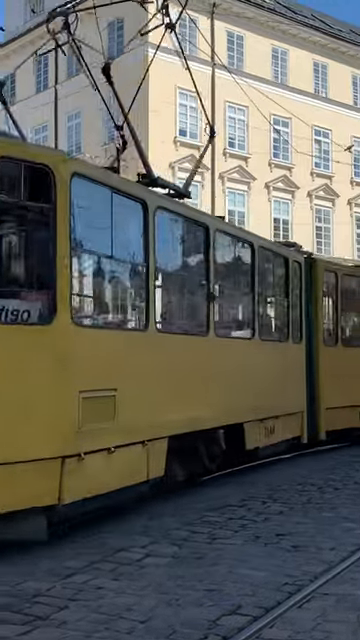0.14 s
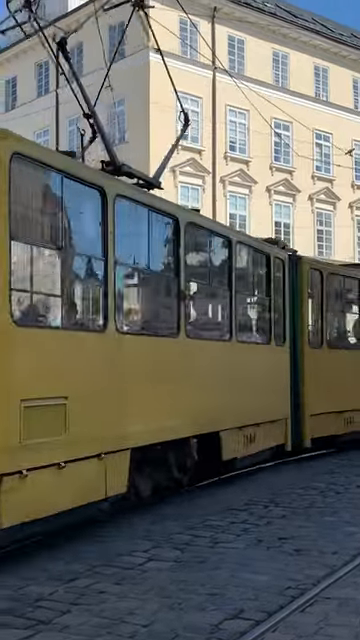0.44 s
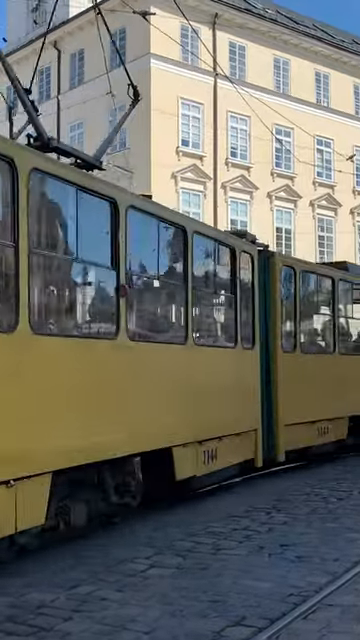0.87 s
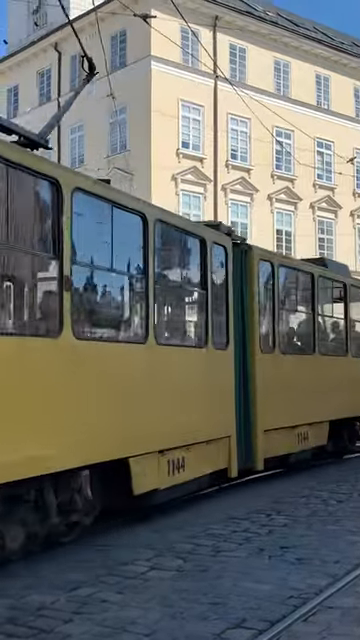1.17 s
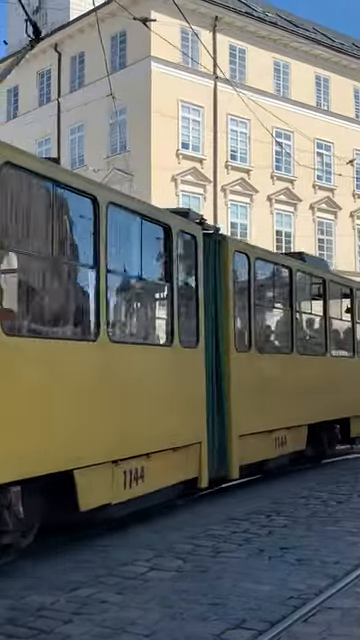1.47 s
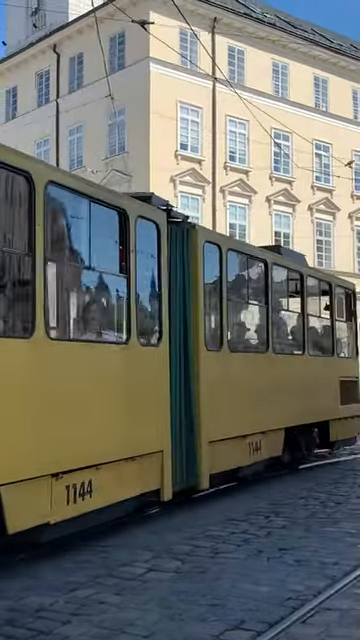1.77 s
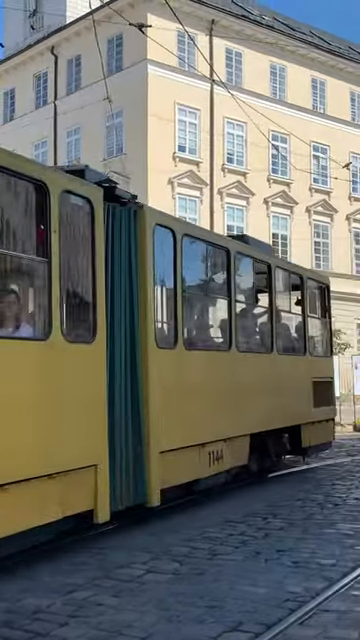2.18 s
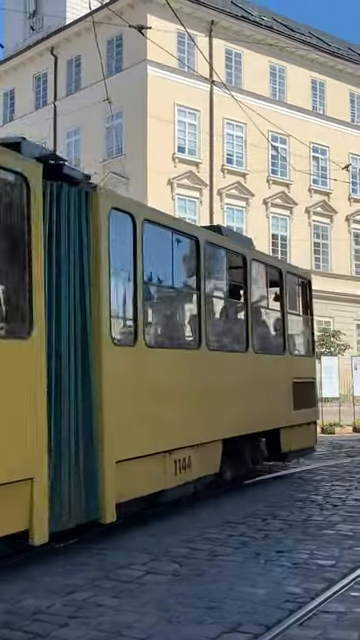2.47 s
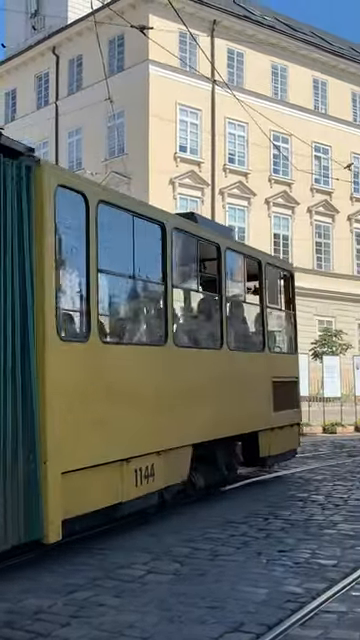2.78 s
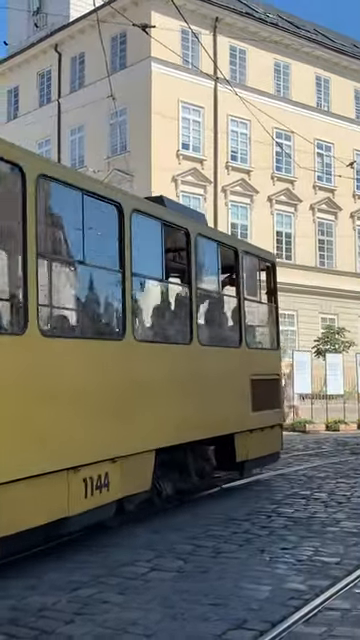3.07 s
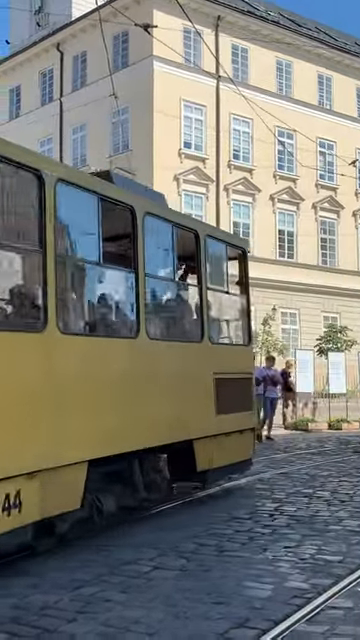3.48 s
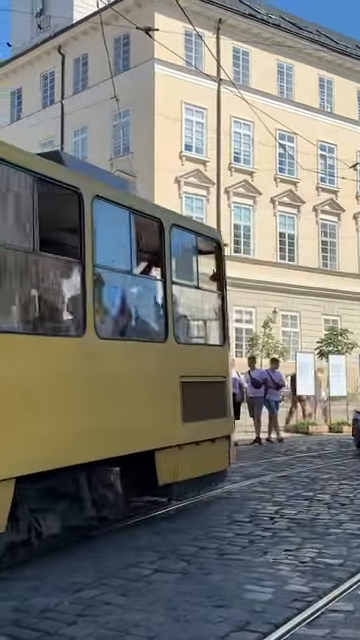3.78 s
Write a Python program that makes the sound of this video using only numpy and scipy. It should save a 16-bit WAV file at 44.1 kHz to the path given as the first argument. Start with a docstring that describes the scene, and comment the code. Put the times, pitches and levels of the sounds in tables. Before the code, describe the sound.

Passing tram with low rumble, grinding wheels and hissing rails, ending in groans and very high squeal

```python
"""A tram creeps round a bend on a cobbled street, a few metres away: shaped noise makes its body rumble and its
wheels roll and grind. The flanges hiss on the rail as noise, which sets the steel ringing in narrow noise bands.
One sharp clack and a dull bump come early, made of fading sine waves. Later a low groan of sine waves swells
three times, loose steel rattles in fading sine waves and scrapes of noise, and a rough, very high squeal wavers
as the rear bogie (wheel frame) draws near."""
import sys
import numpy as np
from scipy import signal
from scipy.fft import rfft, irfft
from scipy.io import wavfile

SR = 44100
rng = np.random.default_rng(int(sys.argv[2]) if len(sys.argv) > 2 else 0)


def materialize(psi):
    """Save the field psi as 16-bit PCM at rate SR to the path in sys.argv[1].

    A 1-D psi becomes a single channel; in a 2-D psi each row is a channel.
    """
    bounded = np.clip(np.atleast_2d(psi).T, -1, 1)
    quanta = np.round(bounded * 32767).astype(np.int16)
    wavfile.write(sys.argv[1], SR, quanta)


N = 173754
T = np.arange(N) / SR  # time of every sample, s
HZ = np.maximum(np.arange(N // 2 + 1) * SR / N, 1)  # frequency of every spectrum bin


def from_db(db):
    """Turn decibels into gain."""
    return 10 ** (np.asarray(db) / 20)


def rms_one(x):
    """Scale to an rms of 1."""
    return x / np.sqrt(np.mean(x ** 2) + 1e-20)


def in_time(rows):
    """Draw straight lines between a table's rows, giving each column at every sample."""
    s, *columns = np.transpose(rows)
    return [np.interp(T, s, column) for column in columns]


def at_hz(points, hz=HZ):
    """Read a table along log frequency, with straight lines between its rows."""
    f, value = np.transpose(points)
    return np.interp(np.log(hz), np.log(f), value)


def drift(rate_hz):
    """Random wandering with an rms of 1; a higher rate wanders faster."""
    spectrum = rfft(rng.standard_normal(N))
    return rms_one(irfft(spectrum / (1 + (HZ / rate_hz) ** 2), N))


def pan(db):
    """Left and right gains that differ by the given decibels; positive is louder on the left."""
    return from_db(np.array([[.5], [-.5]]) * db)


# How alike the two channels are: f/Hz, correlation (1 = the same, 0 = unrelated)
CHANNEL_LIKENESS = [(60,.96),(100,.95),(160,.88),(300,.8),(450,.6),(740,.25),(1100,.45),(2000,.35),(4000,.25),(7000,.5),(10000,.7)]
# How much later the left channel is (negative = earlier): f/Hz, delay/s
LEFT_DELAY = [(400,-.00012),(750,.00002),(1400,.00023),(10000,.0003)]
# How much louder the left channel is than the right: f/Hz, level/dB
LEFT_BALANCE = [(60,2.5),(160,2),(450,4),(1200,6),(2000,1.5),(3300,0.5),(5500,-2),(9000,0)]


def noise(gain):
    """Stereo noise with a gain per frequency; a shared and an opposed part set the width, and its middle has rms 1."""
    mid, side = rfft(rng.standard_normal((2, N)))
    alike = np.clip(at_hz(CHANNEL_LIKENESS), -.99, .99)
    pair = np.sqrt(1 + alike) * mid + np.sqrt(1 - alike) * side * [[1], [-1]]
    pair[0] *= np.exp(-2j * np.pi * HZ * at_hz(LEFT_DELAY))
    x = irfft(pair * gain * pan(at_hz(LEFT_BALANCE)), N)
    return x / x.mean(0).std()


def coloured(spectrum):
    """Noise whose tone colour follows a table; only the table's relative levels matter."""
    return noise(from_db(at_hz(spectrum)))


def resonance(hz, width_hz):
    """Gain of a narrow resonance: half height at width_hz from its centre, scaled to rms 1."""
    return rms_one(1 / (1 + ((HZ - hz) / width_hz) ** 2))


def bursts(rows, rise_s, decay_s):
    """Loudness curve of short events (t/s, level/dB): a straight rise, then an exponential fall."""
    total = 0
    for s, db in rows:
        rise = np.clip((T - s) / rise_s, 0, 1)
        fall = np.exp(-np.maximum(T - s - rise_s, 0) / decay_s)
        total = total + from_db(db) * rise * fall
    return total


def strike(hits, modes, contact_s):
    """Blows (t/s, level/dB) ring fading modes (f/Hz, level/dB, t60/s); longer contact starts more softly."""
    out = np.zeros(N)
    for s, db in hits:
        first = int(s * SR)
        age = T[:min(SR // 2, N - first)]
        ring = 0
        for hz, level, t60 in modes:
            ring = ring + from_db(db + level - 60 * age / t60) * np.sin(2 * np.pi * hz * age)
        out[first:first + len(age)] += ring * (1 - np.exp(-(age / contact_s) ** 2))
    return out


# Levels before trim: t/s, rumble level/dB, drone level/dB
BODY_LEVELS = [(0.0, -37.5, -32), (0.7, -31, -30.5), (0.84, -34, -33), (0.92, -25.5, -29),
               (1.04, -30.5, -31.5), (1.33, -32, -27), (2.37, -36.5, -21.5), (2.53, -38.5, -24),
               (2.98, -28, -21), (3.16, -28, -25.5), (3.57, -29.5, -24.5), (3.94, -27, -23.5)]
# Tone colour of the deep rumble: f/Hz, level/dB
RUMBLE_COLOUR = [(28,-24),(36,-9),(46,-4),(59,4),(72,2),(100,-5),(140,-1.5),(190,-21),(300,-82)]
# Tone colour of the body's drone: f/Hz, level/dB
DRONE_COLOUR = [(100,-6),(150,-8),(195,0),(260,-2),(340,-2),(420,-7.5),(500,-15),(680,-27.5),(1200,-91)]
RUMBLE_TRIM_DB, DRONE_TRIM_DB = -0.5, 1


def rumble_and_drone():
    """The tram's body gives a deep rumble and a higher, unsteady drone, both shaped noise."""
    rumble_db, drone_db = in_time(BODY_LEVELS)
    rumble = from_db(RUMBLE_TRIM_DB + rumble_db) * coloured(RUMBLE_COLOUR)
    unsteady_db = 1.16 * drift(5.4)
    drone = from_db(DRONE_TRIM_DB + drone_db + unsteady_db) * coloured(DRONE_COLOUR)
    return rumble + drone


# Level of the rolling wheels before trim: t/s, level/dB
ROLL_LEVEL = [(0.0, -43), (0.76, -41), (0.92, -38.5), (1.24, -41.5), (1.38, -38), (1.63, -36), (3.94, -35)]
# Tone colour of the rolling wheels: f/Hz, level/dB
ROLL_COLOUR = [(150,-39),(400,0),(520,-3.5),(556,3),(585,-2),(690,-4),(850,0),(1020,1.5),(1200,-8),(1350,-5.5),(1600,-12.5),(2500,-25.5),(5000,-66)]
ROLL_TRIM_DB = 1


def wheel_roll():
    """The wheels roar as they roll: noise of unsteady level."""
    roll_db, = in_time(ROLL_LEVEL)
    return from_db(ROLL_TRIM_DB + roll_db + 1.36 * drift(11.4)) * coloured(ROLL_COLOUR)


# Level of the grit on the rail: t/s, level/dB
GRIT_LEVEL = [(0,-47),(.45,-44),(.6,-46.5),(1.0,-45),(1.5,-44),(1.9,-44.5),(2.2,-39.5),(2.5,-43.5),(3.05,-39),(3.45,-41),(3.62,-38.5),(3.94,-42)]
# Tone colour of the grit: f/Hz, level/dB
GRIT_TONE = [(900,-14.5),(1500,2.5),(2050,4),(2400,-1.5),(3400,-3.5),(4500,-3.5),(5800,-8),(7300,-6.5),(8300,-34),(10500,-9.5),(16000,-34)]


def rail_grit():
    """Grit grinds on the rail: brighter noise that flickers in level."""
    grit_db, = in_time(GRIT_LEVEL)
    return from_db(grit_db + 2.12 * drift(14)) * coloured(GRIT_TONE)


# How strongly the flanges rub the rail, before trims: t/s, level/dB
RUB_LEVEL = [(0,-45.5),(.12,-38.5),(.3,-44.5),(.49,-42),(.55,-55),(.9,-54.5),(1.2,-52.5),(1.56,-54.5),(1.66,-42.5),(1.76,-53),(1.9,-40),(2.3,-42),(2.45,-41),(2.7,-37),(3.0,-41),(3.3,-39.5),(3.48,-51),(3.94,-44.5)]
# Tone colour of the rubbing hiss: f/Hz, level/dB
HISS_COLOUR = [(2000,-17),(4100,-1.5),(5100,-4.5),(7300,-1.5),(8400,-28),(9700,3.5),(11400,0.5),(12600,5.5),(13500,-24),(14500,0),(15700,5)]
# Wheel modes set ringing by the rubbing: f/Hz, width/Hz, front bogie level/dB, later bogies level/dB
WHEEL_MODES = [(2745,55,-18.5,-21),(3275,50,-18,-24),(4120,92,-14.5,-20),(4550,100,-35,-22.5),(6860,49,-9,-20),(9720,120,-12.5,-17),(11335,75,-11,-14),(14600,115,-14.5,-13)]
HISS_TRIM_DB, RING_TRIM_DB, RING_FLUTTER_DB = -1, 5.5, 3
BOGIE_CHANGE_S = 1.2
RING_THRESHOLD_DB, RING_KNEE_DB = -53, 2  # the ringing fades in smoothly around this rubbing level


def flanges():
    """Flanges hiss as they rub the rail; hard enough rubbing keeps the wheel's high modes ringing."""
    rub_db, = in_time(RUB_LEVEL)
    grip = 1 / (1 + np.exp((RING_THRESHOLD_DB - rub_db) / RING_KNEE_DB))
    rings = 0
    for hz, width, front_db, later_db in WHEEL_MODES:
        mode_db = np.where(T < BOGIE_CHANGE_S, front_db, later_db) + RING_FLUTTER_DB * drift(18)
        rings = rings + from_db(mode_db) * noise(resonance(hz, width))
    hiss = from_db(HISS_TRIM_DB) * coloured(HISS_COLOUR)
    ringing = from_db(RING_TRIM_DB) * grip * rings
    return from_db(rub_db + 0.97 * drift(17)) * (hiss + ringing)


# Flange whistles: peak t/s, time from the peak to 1/e of it/s, f/Hz, level/dB
FLANGE_WHISTLES = [(.24,.2,5472,-45),(2.1,.15,5472,-54),(3.1,.1,5942,-49)]
WHISTLE_WIDTH_HZ = 26


def flange_whistles():
    """Now and then a flange whistles: a very narrow band of noise swells and fades."""
    out = 0
    for s, spread, hz, db in FLANGE_WHISTLES:
        swell = np.exp(-((T - s) / spread) ** 2)
        out = out + from_db(db) * swell * noise(resonance(hz, WHISTLE_WIDTH_HZ))
    return out


STREET_DB, STREET_T60_S, STREET_DELAY_S = -7, 0.19, .013  # tram's side and cobbles
SQUARE_DB, SQUARE_T60_S, SQUARE_DELAY_S = -14.5, 1.8, 0.064  # house fronts
ECHO_DULL_HZ = 3570  # low-pass corner


def street(x):
    """Quick reflections from the tram's side and the cobbles, then a faint tail from the house fronts."""
    age = T[:SR]
    echo = 0
    for db, t60, delay in ((STREET_DB, STREET_T60_S, STREET_DELAY_S),
                           (SQUARE_DB, SQUARE_T60_S, SQUARE_DELAY_S)):
        fade = from_db(-60 * age / t60) * (age > delay)
        echo = echo + from_db(db) * rng.standard_normal((2, SR)) * fade / np.linalg.norm(fade)
    echo = signal.lfilter(*signal.butter(1, ECHO_DULL_HZ, fs=SR), echo)
    return signal.fftconvolve(x, echo, axes=1)[:, :N]


# Quick contacts before trim: t/s, low modes level/dB, high modes level/dB, crack level/dB
CLACK_CONTACTS = [(.7393,-13,1,-20),(.7426,-2.5,-0.5,-20),(.7459,-10,-18,-18),(.7478,5,-25,-28),(.7499,3,-26,-26),(.7509,-6,-26,-21)]
# Low modes of the struck metal: f/Hz, level/dB, t60/s
CLACK_LOW_MODES = [(870,-24,0.017),(997,-1,0.017),(1090,-25,0.018)]
# High modes of the struck metal: f/Hz, level/dB, t60/s
CLACK_HIGH_MODES = [(1490,-29,0.046),(1727,-10.5,0.059),(2060,-17.5,0.057),(2810,-27,0.066),(3200,-24,.04),(3610,-19.5,.032),(5060,-23,0.033)]
# Tone colour of the noisy crack: f/Hz, level/dB
CRACK_COLOUR = [(300,-35),(700,1),(1100,9.5),(2200,2.5),(3800,-1),(5200,-12),(7000,-5.5),(8400,-27),(10300,-1),(12500,-6),(13500,-24),(15000,-12)]
CLACK_CONTACT_S, LEFT_LAG_S = 0.0012, 0.000096
CRACK_RISE_S, CRACK_DECAY_S = 0.00039, 0.0041
CLACK_TRIM_DB, CLACK_LOW_CUT_HZ = -1, 530


def clack():
    """A hard metal part chatters brightly and snaps home close by, and the street answers."""
    channels = []
    for lag in (LEFT_LAG_S, 0):
        low_hits = [(s + lag, low_db) for s, low_db, _, _ in CLACK_CONTACTS]
        high_hits = [(s + lag, high_db) for s, _, high_db, _ in CLACK_CONTACTS]
        channels.append(strike(low_hits, CLACK_LOW_MODES, CLACK_CONTACT_S)
                        + strike(high_hits, CLACK_HIGH_MODES, CLACK_CONTACT_S))
    ring = np.array(channels) * pan(db=2.0)
    crack_hits = [(s, crack_db) for s, _, _, crack_db in CLACK_CONTACTS]
    crack = bursts(crack_hits, CRACK_RISE_S, CRACK_DECAY_S) * coloured(CRACK_COLOUR)
    low_cut = signal.butter(3, CLACK_LOW_CUT_HZ, "high", fs=SR, output="sos")
    direct = from_db(CLACK_TRIM_DB) * signal.sosfilt(low_cut, ring + crack)
    return direct + street(direct)


# Short slips of a wheel: t/s, low mode level/dB, high mode level/dB
WHEEL_SLIPS = [(.955,-35,-48),(1.157,-38,-51),(1.62,-42,-46),(2.156,-38,-45),(2.275,-46,-31),(2.75,-41,-34.5),(2.775,-47,-41),(2.925,-45,-42),(3.062,-43,-43),(3.257,-33,-37),(3.625,-24,-33),(3.633,-41,-42),(3.647,-38,-39),(3.744,-31,-39.5),(3.773,-32,-42)]
SLIP_HZ, SLIP_WANDER_HZ = (1980, 4564), (58, 85)  # low mode, high mode
SLIP_RISE_S, SLIP_DECAY_S, SLIP_RAGGED_DB = 0.0054, 0.018, 3


def slips():
    """A wheel slips briefly and sings in two modes of ragged level and unsteady pitch."""
    out = 0
    for k, hz in enumerate(SLIP_HZ):
        pitch = [hz + SLIP_WANDER_HZ[k] * drift(150.3) for _ in range(2)]  # one per channel
        phase = 2 * np.pi * np.cumsum(pitch, axis=1) / SR
        ragged = rms_one(from_db(SLIP_RAGGED_DB * drift(110)))
        hits = [(row[0], row[k + 1]) for row in WHEEL_SLIPS]
        out = out + 2 * np.sin(phase) * ragged * bursts(hits, SLIP_RISE_S, SLIP_DECAY_S)
    return out


# Dull bumps of the car body: t/s, level/dB
BODY_BUMPS = [(1.602,2),(1.6115,-11),(1.632,-6),(1.673,-15)]
# Modes of the car body: f/Hz, level/dB, t60/s
BODY_MODES = [(241,-18,0.078),(340,-11,0.051),(386,-11,0.07),(578,-25,0.14)]
BUMP_CONTACT_S = 0.0022


def body_bumps():
    """The car body bumps dully: soft blows on its low, quickly fading modes."""
    return strike(BODY_BUMPS, BODY_MODES, BUMP_CONTACT_S) * pan(db=6)


BOOM_HZ, BOOM_PEAK_S, BOOM_SPREAD_S, BOOM_DB = 205.7, 2.54, 0.26, -27.5


def panel_boom():
    """A body panel booms: a low sine wave of wavering pitch and level swells and fades."""
    phase = 2 * np.pi * np.cumsum(BOOM_HZ * (1 + 0.026 * drift(7.8))) / SR
    swell = np.exp(-((T - BOOM_PEAK_S) / BOOM_SPREAD_S) ** 2)
    return from_db(BOOM_DB + 2 * drift(19)) * swell * np.sin(phase) * pan(db=6)


# Level of the groan, later doubled: t/s, level/dB
GROAN_LEVEL = [(2.2,-45),(2.3,-37.5),(2.5,-28.5),(2.6,-22),(2.72,-40.5),(2.8,-55),(3.0,-39),(3.14,-25),(3.2,-36.5),(3.3,-49.5),(3.38,-32),(3.52,-37.5),(3.63,-22),(3.72,-35),(3.8,-31.5),(3.94,-41)]
# Pitch of the groan before wavering: t/s, f/Hz
GROAN_HZ = [(2.54,554),(2.62,560),(2.72,565),(3.05,548),(3.2,562),(3.36,549.5)]
GROAN_WAVER, GROAN_OCTAVE_DB = 0.005, -22  # fraction of the pitch; octave relative to the main tone


def groan():
    """The wheel's lowest mode sings in the bend, creeping up through the first two swells, with a faint octave."""
    db, = in_time(GROAN_LEVEL)
    hz, = in_time(GROAN_HZ)
    phase = 2 * np.pi * np.cumsum(hz * (1 + GROAN_WAVER * drift(12.3))) / SR
    phase = phase + np.array([[2.1], [0]])  # left channel ahead, in radians
    tone = np.sin(phase) + from_db(GROAN_OCTAVE_DB) * np.sin(2 * phase)
    return 2 * from_db(db + 2.0 * drift(24)) * tone * pan(db=2.5)


# Gritty scrapes: t/s, level/dB
GRIT_SCRAPES = [(2.29,-32.5),(3.598,-33.5),(3.612,-30.5),(3.64,-34),(3.663,-32),(3.68,-38)]
# Tone colour of the scrapes: f/Hz, level/dB
SCRAPE_COLOUR = [(1200,-9),(2000,0),(2450,3),(2900,0.5),(3350,-8),(3900,-3),(5000,-3),(7000,-8),(8400,-18),(11500,-3),(13500,-16)]
SCRAPE_RISE_S, SCRAPE_DECAY_S = 0.0027, 0.019
SCRAPE_GRAIN_DB, SCRAPE_GRAIN_RATE_HZ = 1.5, 250


def scrapes():
    """The wheels crunch over grit: short bursts of noise with a grainy level."""
    grains = rms_one(from_db(SCRAPE_GRAIN_DB * drift(SCRAPE_GRAIN_RATE_HZ)))
    return bursts(GRIT_SCRAPES, SCRAPE_RISE_S, SCRAPE_DECAY_S) * grains * coloured(SCRAPE_COLOUR)


# Clinks of loose steel: t/s, level/dB
STEEL_CLINKS = [(2.297,-10),(3.6145,2),(3.6225,-6),(3.6655,-2),(3.6705,-11)]
# Modes of the steel on the bogie: f/Hz, level/dB, t60/s
BOGIE_MODES = [(2250,-28,0.045),(2890,-23,.05),(5200,-28,0.049),(5870,-34,.03),(6900,-26,0.035)]
CLINK_CONTACT_S = 0.00052


def rattle():
    """Loose steel on the bogie clinks: quick blows on its high modes, and the street answers."""
    clinks = strike(STEEL_CLINKS, BOGIE_MODES, CLINK_CONTACT_S) * pan(db=-5)
    return clinks + street(clinks)


# The squeal before wavering and trim: t/s, f/Hz, level/dB
SQUEAL_PATH = [(3.05,12300,-110),(3.11,12500,-56),(3.16,12600,-47),(3.24,12000,-46),(3.33,11500,-39),(3.42,12700,-52),(3.48,12250,-47),(3.56,11800,-40),(3.63,12400,-45),(3.71,12500,-47),(3.77,11860,-41.5),(3.85,11800,-42),(3.89,12100,-45),(3.94,11200,-33)]
SQUEAL_ROUGHNESS_HZ, SQUEAL_TRIM_DB = 93, 1


def squeal():
    """A thin friction whistle wavers in pitch; fast random changes of its sine and cosine make it rough."""
    hz, db = in_time(SQUEAL_PATH)
    phase = 2 * np.pi * np.cumsum(hz + 50 * drift(32)) / SR
    pair = []
    for _ in range(2):
        pair.append(drift(SQUEAL_ROUGHNESS_HZ) * np.sin(phase) + drift(SQUEAL_ROUGHNESS_HZ) * np.cos(phase))
    return from_db(db + SQUEAL_TRIM_DB) * np.sqrt(2) * np.array(pair)


def scene():
    """Add up all the sounds of the tram."""
    running = rumble_and_drone() + wheel_roll() + rail_grit() + flanges() + flange_whistles()
    knocks = clack() + body_bumps() + scrapes() + rattle()
    singing = slips() + panel_boom() + groan() + squeal()
    return running + knocks + singing


LOW_CUT_HZ, TOP_CUT_HZ, PEAK_LIMIT = 48.7, 16000, .92  # the limit is a fraction of full scale


def record(dry):
    """The microphone loses the deepest bass, peaks are clipped at the limit, then the top is cut."""
    low_cut = signal.butter(4, LOW_CUT_HZ, "high", fs=SR, output="sos")
    top_cut = signal.ellip(12, .1, 90, TOP_CUT_HZ, fs=SR, output="sos")
    x = signal.sosfilt(low_cut, dry)
    return signal.sosfilt(top_cut, np.clip(x, -PEAK_LIMIT, PEAK_LIMIT))


dry = scene()
out = record(dry)
materialize(out)
```